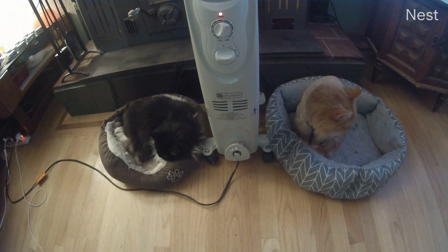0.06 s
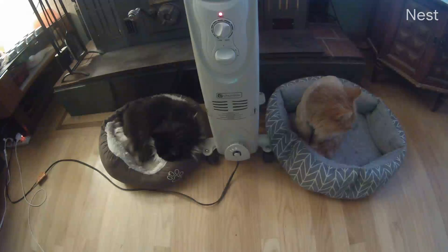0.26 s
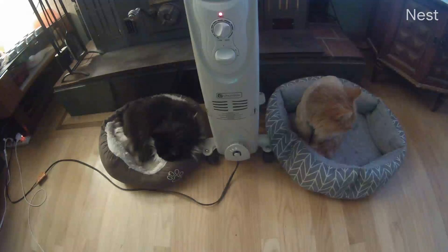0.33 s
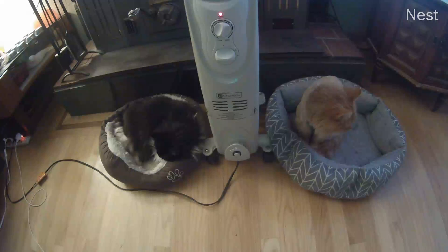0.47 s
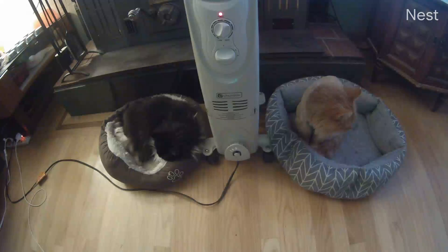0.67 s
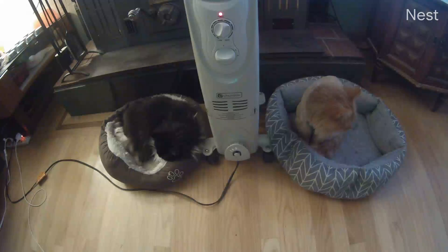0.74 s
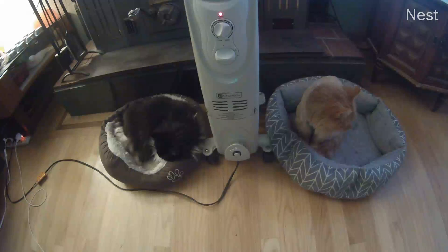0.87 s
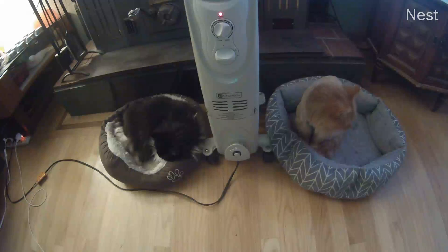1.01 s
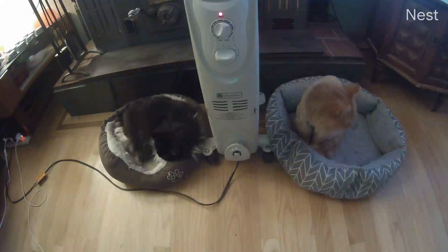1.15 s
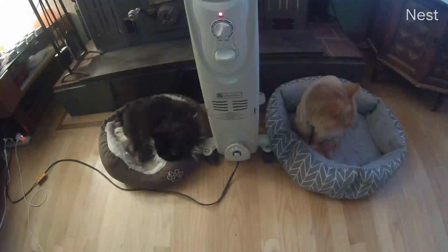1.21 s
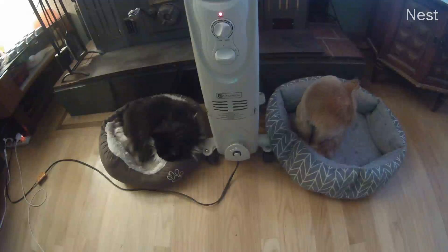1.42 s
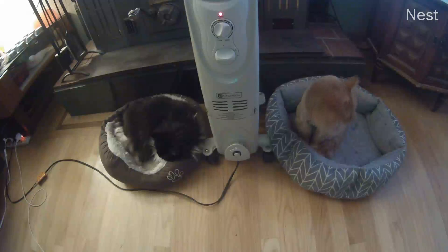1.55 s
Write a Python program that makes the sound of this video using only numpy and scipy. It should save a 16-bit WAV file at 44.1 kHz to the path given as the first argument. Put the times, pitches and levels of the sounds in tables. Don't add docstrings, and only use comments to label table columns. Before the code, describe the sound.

Heater metal ticks and snaps in an irregular flurry, ringing briefly over soft microphone hiss

```python
import sys
import numpy as np
from scipy import signal
from scipy.fft import rfft, irfft
from scipy.io import wavfile
from scipy.ndimage import uniform_filter1d

SR = 44100
rng = np.random.default_rng(int(sys.argv[2]) if len(sys.argv) > 2 else 0)


def dump_mix(stems):
    frames = np.atleast_2d(stems).T
    limited = np.clip(frames, -1, 1)
    pcm = np.round(limited * 32767).astype(np.int16)
    wavfile.write(sys.argv[1], SR, pcm)


def nominal_scale(level):
    x = np.asarray(level, float) / 20
    return 10 ** x


N = 70560

# (frequency [Hz], density [dB per Hz])
HISS_SPECTRUM = [(120, -39), (400, -9.5), (2200, -6), (4900, -7), (5350, -15.5), (6200, -16), (7300, -16.5),
                 (7900, -29.5)]
# (frequency [Hz], gain [dB])
MIC_COLOUR = [(100, -30.5), (200, -18.5), (450, -5), (1000, -0.5), (2100, -3), (4500, -3), (6500, -6.5),
              (7900, -13)]
# (start [s], frequency [Hz], level [dB], t60 [s])
LONE_RINGS = [(0.346, 4730, -56, 0.04), (0.356, 2690, -42, 0.062), (.361, 1815, -28.5, 0.082),
              (.363, 5090, -34, 0.092), (0.368, 4283, -31, 0.056), (0.358, 3900, -31, 0.051),
              (.372, 1862, -33, 0.049), (.377, 2050, -38, 0.051), (0.385, 2530, -36.5, 0.089),
              (0.4, 2524, -41, 0.043), (.468, 2165, -46.5, 0.044), (.595, 2875, -45.5, 0.095),
              (0.95, 4600, -48.5, .05), (0.963, 1717, -42.5, 0.077), (1.043, 4800, -51, 0.037),
              (1.223, 2500, -50, 0.02), (1.228, 3930, -47.5, .09), (1.23, 4790, -50, .07),
              (1.255, 3100, -47, .04), (1.231, 2078, -46.5, 0.071), (1.29, 2774, -44.5, .05)]
# (frequency [Hz], level [dB], t60 [s])
PANEL_MODES = [(472, -4.5, 0.008), (745, -6, 0.017), (1148, -2.5, 0.012), (1726, -7, 0.0082),
               (2232, 2, 0.019), (2760, -0.5, 0.011), (3274, -6.5, 0.0088), (4027, -4, 0.013),
               (5190, -0.5, 0.021)]
# (peak time [s], rise [s], fall [s], level [dB], centre [Hz])
SLIP_EVENTS = [(0.15, 0.021, 0.0094, -59, 5600), (0.24, 0.043, 0.073, -53, 6400),
               (0.22, 0.041, 0.024, -55, 2230), (.225, 0.017, 0.022, -62.5, 810),
               (0.33, 0.0066, 0.029, -51, 279), (0.346, 0.003, 0.012, -49.5, 3400),
               (0.366, .007, 0.012, -42, 2900), (0.56, 0.021, 0.078, -61, 3020),
               (0.6, 0.0074, 0.013, -59, 1230), (0.75, 0.0081, 0.041, -61, 1400),
               (0.81, 0.013, 0.017, -61, 4700), (0.963, 0.012, 0.026, -49, 5700),
               (1, 0.023, 0.025, -54.5, 510), (0.97, .01, 0.011, -58, 1900),
               (1.03, 0.021, 0.044, -58.5, 5100), (1.193, 0.0049, 0.011, -53.5, 7100),
               (1.236, 0.0044, 0.016, -53, 2100), (1.22, 0.008, 0.0053, -61, 2170),
               (1.21, 0.015, 0.059, -54, 187), (0.192, 0.089, 0.033, -62, 115),
               (0.858, 0.04, 0.037, -55.5, 167), (0.97, 0.034, 0.037, -50.5, 128.7),
               (1.301, 0.0087, 0.028, -60.5, 1900), (1.235, .006, 0.017, -57, 3900),
               (.2, 0.051, 0.054, -56.5, 8200), (.377, .005, .012, -46.5, 520), (.17, 0.054, .06, -49, 59),
               (.98, 0.025, 0.035, -59.5, 78)]
# (time [s], level [dB], tilt [dB per octave])
SNAP_EVENTS = [(0.341, -49, 2), (.356, -39, 3), (.360, -29, 1), (.3645, -29, 1.5), (0.3683, -34, 0),
               (.371, -30.5, 2.5), (0.3788, -35.5, -1.5), (0.598, -54, -2.5), (0.614, -56, 5.5),
               (0.76, -48, -5), (.953, -46, -6.5), (0.954, -53, 5), (0.965, -49.5, -3), (0.975, -53.5, 3.5),
               (1.2253, -35.5, 0.5), (1.2306, -41.5, 2), (1.245, -44, 3), (1.261, -50.5, 2), (.19, -55, 0),
               (.218, -42, 2), (.345, -45, 5.5), (0.358, -42.5, 1.5), (.381, -40, 1), (.388, -39, 0),
               (0.401, -42, 0.5), (1.252, -49, -2), (1.29, -52, -1), (1.303, -48.5, 0)]
# (frequency [Hz], gain [dB])
SNAP_COLOUR = [(150, -6.5), (500, 0), (4300, 1.5), (5400, -1.5), (6000, -18), (7500, -19)]
# (frequency [Hz], gain [dB])
STEP_SIZE = [(100, 3), (600, -4), (1500, 2), (2800, 4.5), (3400, 10), (5000, 10), (5800, 9.5), (7500, 9.5)]
# (frequency [Hz], gain [dB])
VANISHING = [(120, -9), (300, -15), (4950, -8), (5150, -1), (5550, 1), (5700, -9), (7100, -7), (7800, -3)]
# (time [s], change [dB])
STEP_DRIFT = [(0, .5), (.3, 1), (.345, 0), (.355, -4), (.4, -3), (.47, -1), (.6, 0), (.78, -1.5), (.9, 1),
              (1.05, 1), (1.2, -1), (1.35, .5), (1.6, .5)]
# (from [s], to [s], low [Hz], high [Hz])
LOST_BANDS = [(.27, .3, 0, 400), (.3405, .3415, 0, 400), (.306, .338, 3500, 4250), (.27, .36, 5300, 5600),
              (.334, .347, 5500, 6400), (.352, .364, 4500, 4800), (0, .09, 5150, 5500),
              (.4, .48, 7050, 8000), (.4, .6, 5450, 5570), (.6, .67, 0, 220), (.65, .73, 5150, 5520),
              (.7, .8, 0, 150), (.9, 1.0, 4800, 4950), (1.04, 1.12, 0, 150), (1.04, 1.18, 7650, 8000),
              (1.1, 1.31, 5400, 5600), (1.15, 1.25, 4450, 4560), (1.3, 1.56, 0, 170),
              (1.3, 1.5, 5150, 5600)]
# (from [s], to [s])
SHORT_STRETCH = (.308, .392)

HISS_DB, FLICKER_DB = -56.5, 0.17
ROOM_DB, ROOM_T60_LOW_S, ROOM_T60_HIGH_S, ROOM_SPLIT_HZ = -0.5, 0.42, 0.25, 3900
SWELL_S = 0.0022
GRAINS_PER_S, GRAIN_SCATTER_DB = 4000, 1.5
SLIP_SKIRT_DB, SLIP_RING_DB = 7, -13
CRACK_DB = 6
CAMERA_SR, GRID = 16000, 333
STEP_SCATTER_DB = 2.5


def shape(points, hz):
    table_hz, db = np.array(points, float).T
    return nominal_scale(np.interp(np.log(np.maximum(hz, 1)), np.log(table_hz), db))


def colour(x, points):
    cepstrum = irfft(np.log(shape(points, np.arange(1025) * SR / 2048)))
    cepstrum[1:1024] *= 2
    cepstrum[1025:] = 0
    impulse = irfft(np.exp(rfft(cepstrum)))[:1024]
    return signal.fftconvolve(x, impulse)[:len(x)]


def tilt(x, db):
    return colour(x, [(250, -3 * db), (8000, 2 * db)])


def unit(x):
    return x / np.sqrt(np.mean(x ** 2))


def decay(t, t60):
    return np.exp(-np.log(1000) * t / t60)


def hiss():
    walk = uniform_filter1d(rng.standard_normal(N), size=3000)
    walk = unit(uniform_filter1d(walk, size=3000))
    return nominal_scale(HISS_DB + FLICKER_DB * walk) * unit(colour(rng.standard_normal(N), HISS_SPECTRUM))


def room(x):
    t = np.arange(SR // 2) / SR
    noise = rng.standard_normal(len(t)) * (1 - np.exp(-t / SWELL_S))
    low = signal.sosfilt(signal.butter(2, ROOM_SPLIT_HZ, fs=SR, output="sos"), noise)
    high = noise - low
    tail = low * decay(t, ROOM_T60_LOW_S) + high * decay(t, ROOM_T60_HIGH_S)
    return nominal_scale(ROOM_DB) * signal.fftconvolve(x, tail / np.sqrt(np.sum(tail ** 2)))[:N]


def panel(gains):
    t = np.arange(SR // 10) / SR
    ring = np.zeros(len(t))
    for gain, (hz, db, t60) in zip(gains, PANEL_MODES):
        mode = np.sin(2 * np.pi * hz * t) * decay(t, t60)
        ring += gain * nominal_scale(db) * mode / np.sqrt(t60)
    return ring / np.sqrt(np.sum(ring ** 2))


def slips():
    t, out = np.arange(N) / SR, np.zeros(N)
    struck = rng.random(N) < GRAINS_PER_S / SR
    grains = struck * rng.standard_normal(N) * nominal_scale(GRAIN_SCATTER_DB * rng.exponential(size=N))
    rub = unit(grains) + 0.51 * rng.standard_normal(N)
    ringing = signal.fftconvolve(rub, panel(np.ones(len(PANEL_MODES))))[:N]
    rub = rub + nominal_scale(SLIP_RING_DB) * ringing
    edge_db = -3 * SLIP_SKIRT_DB
    for peak, rise, fall, db, hz in SLIP_EVENTS:
        swell = np.exp(-((t - peak) / rise) ** 2)
        fade = np.exp(-np.maximum(t - peak, 0) / fall)
        rubbed = rub * np.where(t < peak, swell, fade)
        out += 4.5 * nominal_scale(db) * colour(rubbed, [(hz / 8, edge_db), (hz, 0), (hz * 8, edge_db)])
    return out


def rings():
    t, out = np.arange(N) / SR, np.zeros(N)
    for start, hz, db, t60 in LONE_RINGS:
        since = np.maximum(t - start, 0)
        swell = 1 - np.exp(-since / SWELL_S)
        out += nominal_scale(db) * np.sin(2 * np.pi * hz * since) * swell * decay(since, t60)
    return out


def snaps():
    out = np.zeros(N + SR)
    spots = rng.standard_normal((len(SNAP_EVENTS), len(PANEL_MODES)))
    for (time, db, tilt_db), spot in zip(SNAP_EVENTS, spots):
        hit = panel(np.sign(spot) * nominal_scale(1.9 * spot))
        hit[0] += nominal_scale(CRACK_DB)
        i = int(time * SR)
        out[i:i + len(hit)] += 5.7 * nominal_scale(db) * tilt(hit, tilt_db)
    return colour(out[:N], SNAP_COLOUR)


def scene():
    snap, slip = snaps(), slips()
    at_camera = snap + slip + rings() + room(snap) + room(slip)
    return (colour(at_camera, MIC_COLOUR) + hiss())[None]


def camera_blocks(x, size, mask_db, top_hz):
    n, k = np.arange(2 * size) + 0.5, np.arange(size) + 0.5
    window = np.sin(np.pi * n / (2 * size))[:, None]
    cosines = np.cos(np.pi / size * np.outer(n + size / 2, k))
    base = cosines * window * np.sqrt(2 / size)
    lead = size - GRID % size
    rows = np.pad(x, (lead, 2 * size - (lead + len(x)) % size), mode="reflect").reshape(-1, size)
    lines = np.hstack([rows[:-1], rows[1:]]) @ base
    hz, width = k * CAMERA_SR / 2 / size, max(size // 64, 4)
    count = len(lines)
    band = np.sqrt(np.mean(lines.reshape(count, -1, width) ** 2, axis=2))
    band = np.repeat(band, width, axis=1)
    whim = np.repeat(rng.standard_normal((count, size // width)), width, axis=1)
    block_level = np.sqrt(np.mean(lines ** 2, axis=1, keepdims=True))
    mask = block_level * nominal_scale(mask_db) * shape(VANISHING, hz)
    step = np.maximum(band * shape(STEP_SIZE, hz) / nominal_scale(mask_db), mask)
    step = step * nominal_scale(STEP_SCATTER_DB * whim)
    at = ((np.arange(count) + 1) * size - lead)[:, None] / CAMERA_SR
    step = step * nominal_scale(np.interp(at, *np.array(STEP_DRIFT).T))
    for start, end, low, high in LOST_BANDS:
        lines = lines * ~((at > start) & (at < end) & (hz > low) & (hz < high))
    rounded = np.sign(lines) * np.floor(abs(lines) / step + 0.405) * step
    back = (rounded * (hz < top_hz)) @ base.T
    out = np.vstack([back[:, :size], 0 * back[:1, :size]])
    out[1:] += back[:, size:]
    return out.ravel()[lead:lead + len(x)]


def top_cut(x):
    return signal.sosfilt(signal.butter(12, 8840, fs=SR, output="sos"), x)


def record(dry):
    x = signal.resample_poly(dry[0], 160, 441)
    start, end = SHORT_STRETCH
    corners = [start - 0.004, start + 0.004, end - 0.008, end + 0.008]
    short = np.interp(np.arange(len(x)) / CAMERA_SR, corners, [0, 1, 1, 0])
    long = np.sqrt(1 - short)
    long_part = long * camera_blocks(long * x, 1024, 0, 7850)
    x = long_part + short * camera_blocks(x, 128, 3, 6900)
    leaky = signal.firwin(441 * 16 + 1, 7605, fs=CAMERA_SR * 441, window=("kaiser", 7.0))
    y = signal.resample_poly(x, 441, 160, window=leaky)[:N]
    return top_cut(y[None])


dry = scene()
out = record(dry)
dump_mix(out)
```